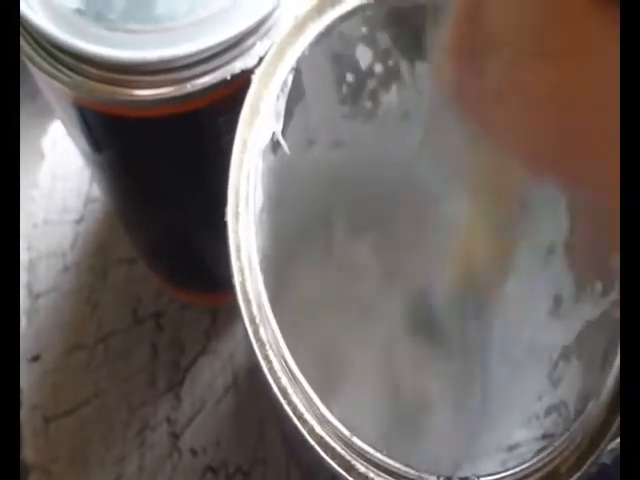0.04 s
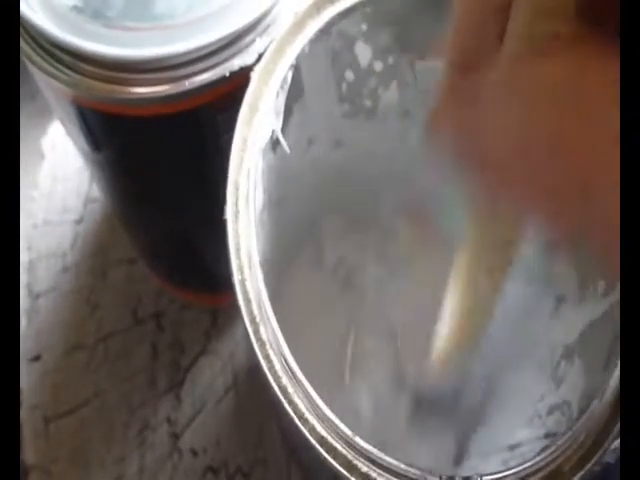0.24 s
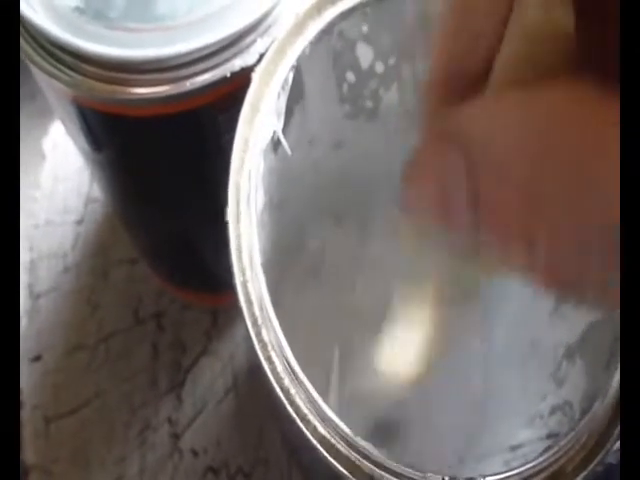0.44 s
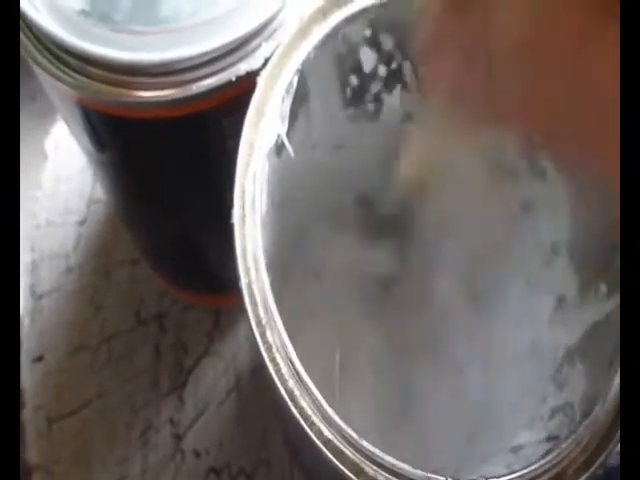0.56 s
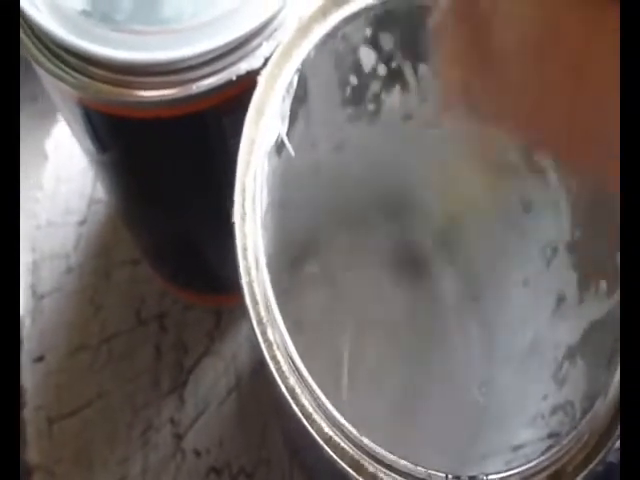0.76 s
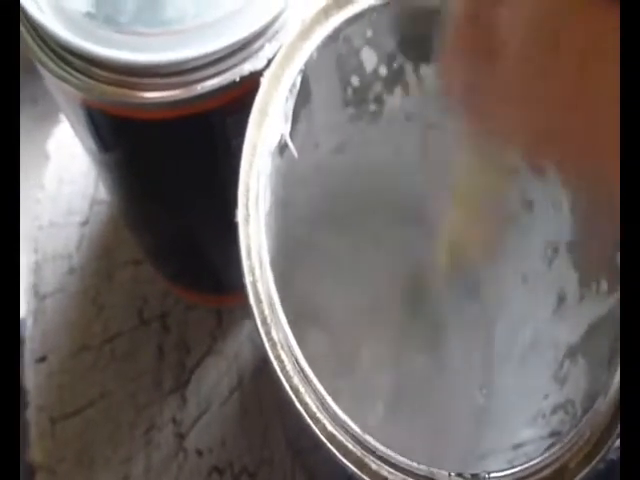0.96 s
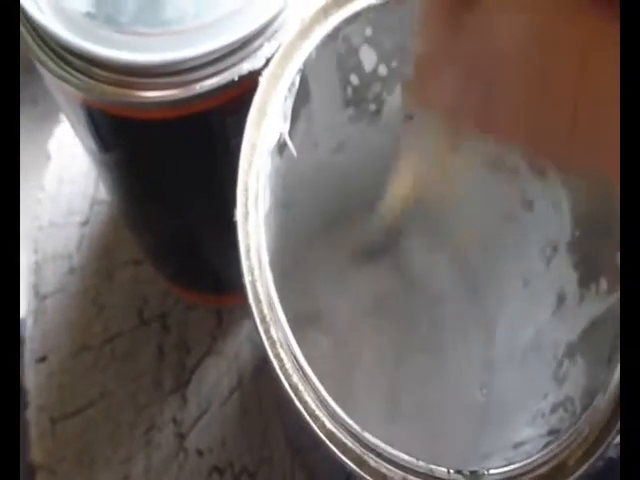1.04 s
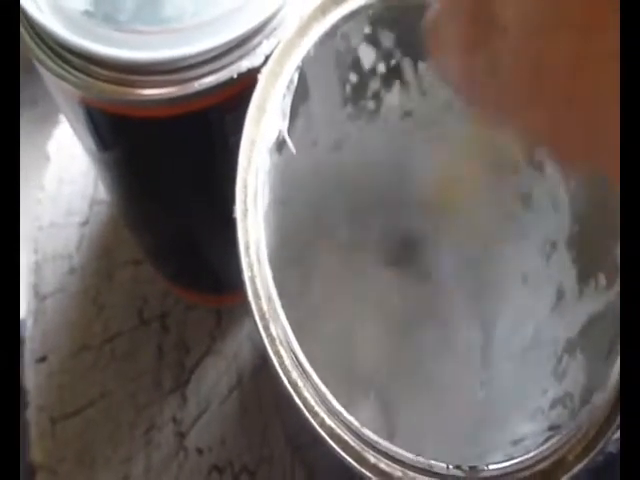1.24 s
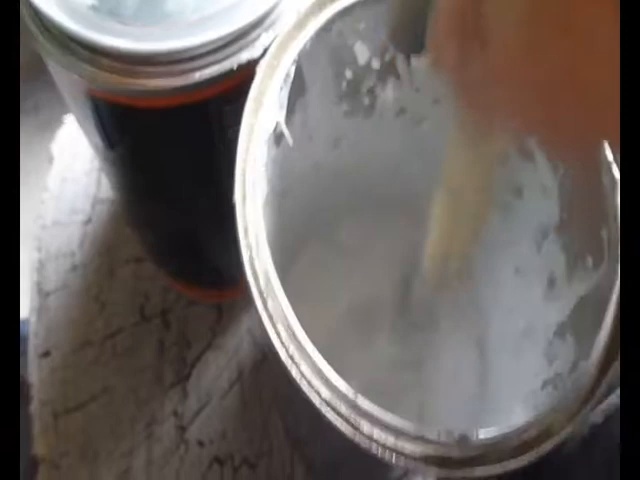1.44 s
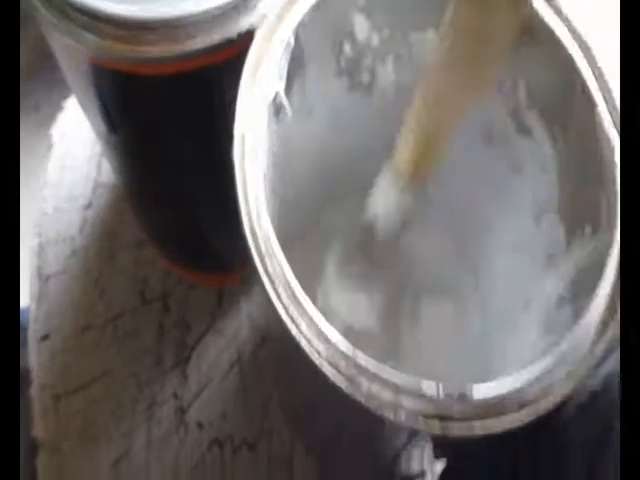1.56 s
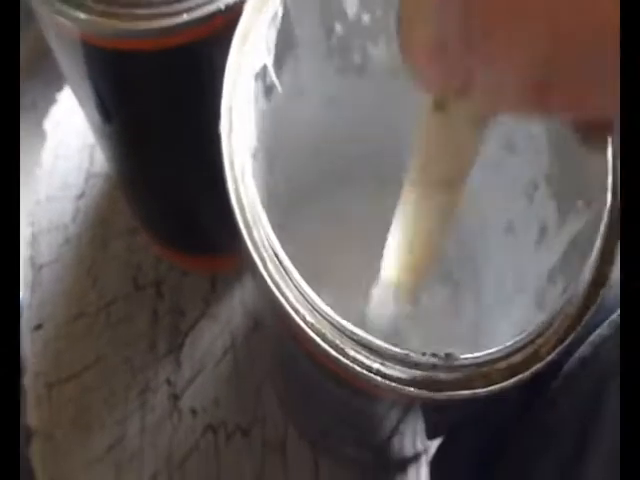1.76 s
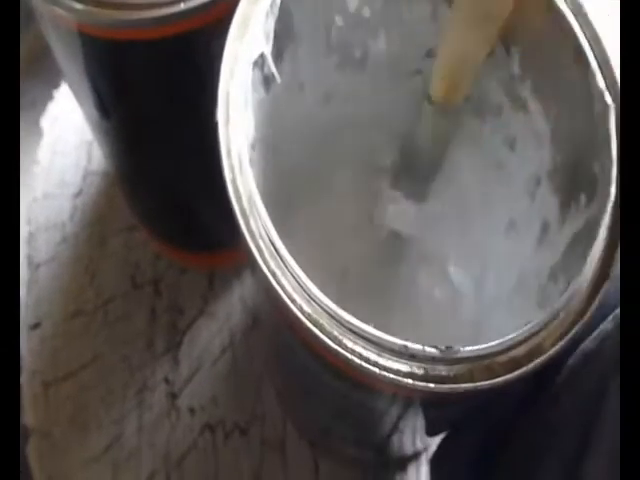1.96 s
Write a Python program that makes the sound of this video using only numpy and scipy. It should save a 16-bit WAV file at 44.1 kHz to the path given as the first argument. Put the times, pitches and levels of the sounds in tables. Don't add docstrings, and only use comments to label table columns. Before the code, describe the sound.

Fast gritty stirring scrapes of a wooden stick in a metal can, with hollow knocks.

```python
import sys
import numpy as np
from scipy import signal
from scipy.fft import rfft, irfft
from scipy.io import wavfile

SR = 44100
rng = np.random.default_rng(int(sys.argv[2]) if len(sys.argv) > 2 else 0)


def generate_wav(signal):
    frames = np.transpose(np.atleast_2d(signal))
    scaled = np.clip(frames, -1, 1) * 32767
    pcm = np.round(scaled).astype(np.int16)
    wavfile.write(sys.argv[1], SR, pcm)


def gain_from_decibels(decibels):
    exponent = np.asarray(decibels, float) / 20
    return 10 ** exponent


N = 88552


def rms_one(x):
    return x / np.sqrt(np.mean(x ** 2) + 1e-20)


def at_hz(points, hz):
    table_hz, values = np.array(points).T
    return np.interp(np.log(hz), np.log(table_hz), values)


def drift(hz):
    r = np.exp(-2 * np.pi * hz / SR)
    settle = 4000
    noise = rng.standard_normal(N + settle)
    return rms_one(signal.lfilter([1], [1, -2 * r, r * r], noise)[settle:])


def resonate(x, hz, width_hz):
    r = np.exp(-np.pi * width_hz / SR)
    top = np.array([1, 0, -1]) * (1 - r * r) / 2
    return signal.lfilter(top, [1, -2 * r * np.cos(2 * np.pi * hz / SR), r * r], x + 1e-18)


def bands(x, low_hz):
    edges = low_hz * 2 ** np.arange(0, np.log2(17000 / low_hz), 1 / 3)
    slices = []
    for k, (low, high) in enumerate(zip(edges, edges[1:])):
        band = signal.butter(2, [low, high], "band", fs=SR, output="sos")
        slices.append((np.sqrt(low * high), signal.sosfilt(band, x[k % 2])))
    return slices


def strike(rows, shape):
    length = 3000
    out, t = np.zeros(N + length), np.arange(length) / SR
    for s, db, hz in rows:
        start = int(s * SR)
        out[start:start + length] += gain_from_decibels(db) * shape(t, hz)
    return out[:N]


# start in seconds, end in seconds, level in dB,
# where along the stroke the tip is fastest (0 to 1).
STROKES = [(-.03, 0.109, -26, 0.65), (0.102, 0.199, -26, .6), (0.191, 0.212, -31.5, 0.5),
           (0.203, 0.363, -27.5, 0.71), (.358, .424, -24, 0.61), (0.43, 0.462, -29, 0.3),
           (0.452, 0.608, -28.5, 0.53), (0.603, 0.704, -26, 0.36), (0.698, 0.826, -28, 0.46),
           (.828, 0.937, -25, 0.48), (0.948, 1.059, -26.5, 0.01), (1.064, 1.163, -26.5, 0.52),
           (1.172, 1.287, -26, 0.5), (1.282, 1.381, -25.5, 0.56), (1.39, 1.502, -27.5, 0.68),
           (1.517, 1.601, -26, 0.33), (1.641, 1.731, -25.5, 0.56)]


def effort_db():
    lift_s, lift_fade_s = 1.712, 0.02
    edge = 0.45
    drag = gain_from_decibels(-35.5)
    t = np.arange(N) / SR
    level = drag * np.ones(N)
    for start, end, db, top in STROKES:
        places = np.array([0, edge * top, top, 1 - edge * (1 - top), 1])
        phase = np.interp(t, start + (end - start) * places, [0, 0.3, 0.5, 0.7, 1])
        level = level + gain_from_decibels(db) * np.maximum(np.sin(np.pi * phase), 0)
    lifted = np.exp(-np.maximum(t - lift_s, 0) / lift_fade_s)
    contact = (level - drag + lifted * drag) / level
    return 20 * np.log10(level), contact


# pitch in Hz, level in dB.
SCRAPE = [(600, -20), (750, -12), (1860, -6.5), (3500, 0), (5000, -1.5), (7000, -21.5), (10000, -47),
          (16000, -11)]
# pitch in Hz, share of the stroke's rise and fall in dB.
FOLLOWS = [(700, 0.15), (2500, 0.62), (5000, 1.17), (12000, 2.4)]


def small_modes(grit, swing_db):
    count = 44
    pitches = np.geomspace(1000, 10000, num=count) * rng.uniform(0.98, 1.02, count)
    out = np.zeros(N)
    for k, hz in enumerate(pitches):
        level_db = at_hz(SCRAPE, hz) + 5 + at_hz(FOLLOWS, hz) * swing_db
        patches_db = 4.5 * drift(19.5)
        push = np.roll(grit[k % 2], 777 * k)
        out = out + gain_from_decibels(level_db + patches_db) * resonate(push, hz, width_hz=95)
    return out


# pitch in Hz, width in Hz, level in dB.
WALL = [(1850, 100, -14), (2595, 70, -13), (3010, 90, -10), (3500, 130, -8), (3780, 90, -12),
        (4400, 110, -10), (4570, 120, -8), (4930, 70, -11), (5600, 130, -13), (6300, 110, -18),
        (7500, 170, -24), (8620, 200, -26)]


def scrape(db, contact):
    grit_per_s, grit_spread_db = 6000, 1.5
    clump_db, clump_hz = 1.3, 110
    patch_db, patch_hz = 5, 24.7
    wall_patch_db, wall_patch_hz = 3, 20
    mean_db = -31.5
    swing_db = db - mean_db

    sizes_db = grit_spread_db * np.minimum(rng.exponential(1, (2, N)), 4)
    sizes = gain_from_decibels(sizes_db) * rng.choice([-1, 1], (2, N))
    snaps = rng.random((2, N)) < grit_per_s / SR
    grit = rms_one(sizes * snaps) * gain_from_decibels(clump_db * drift(clump_hz))

    out = np.zeros(N)
    for hz, x in bands(grit, 699.3):
        level_db = at_hz(SCRAPE, hz) + at_hz(FOLLOWS, hz) * swing_db
        out = out + gain_from_decibels(level_db + patch_db * drift(patch_hz)) * x
    for k, (hz, width_hz, level_db) in enumerate(WALL):
        push_db = at_hz(FOLLOWS, hz) * swing_db + wall_patch_db * drift(wall_patch_hz)
        out = out + gain_from_decibels(level_db + 11) * resonate(grit[k % 2] * gain_from_decibels(push_db), hz, width_hz)
    out = out + small_modes(grit, swing_db)
    return gain_from_decibels(mean_db + 0.34) * rms_one(out * contact)


# loudest moment in seconds, level in dB, pitch in Hz.
CATCHES = [(0.016, -38, 6120), (0.036, -33, 4380), (0.091, -36, 2010), (0.1, -29, 3120), (0.136, -56, 3450),
           (0.162, -24.5, 4475), (0.164, -38, 3620), (0.238, -29.5, 2930), (0.272, -31, 4300),
           (0.31, -26.5, 4600), (0.375, -35, 4430), (0.576, -33, 4620), (0.637, -28, 4920),
           (0.673, -26, 3415), (0.771, -27.5, 4610), (0.798, -28.5, 3177), (1.007, -26.5, 4575),
           (1.072, -30.5, 3470), (1.12, -31, 4500), (1.206, -35, 4650), (1.215, -26.5, 3510),
           (1.315, -28, 3530), (1.348, -30.5, 4500), (1.373, -32, 3340), (1.537, -32.5, 3560),
           (1.575, -29.5, 3410), (1.671, -25.5, 3100), (1.678, -42, 4700)]


def catches():
    catch_s, width_hz = 0.028, 140

    def swell(t, hz):
        noise = rng.standard_normal(len(t))
        ring = rms_one(resonate(resonate(noise, hz, width_hz), hz, 3 * width_hz))
        return gain_from_decibels(-0.5) * ring * np.sin(np.pi * np.clip(t / catch_s, 0, 1)) ** 2

    starts = [(max(s - catch_s / 2, 0), db, hz) for s, db, hz in CATCHES]
    return strike(starts, swell)


# pitch in Hz, width in Hz, level in dB.
HOLLOW = [(450.2, 71.5, -5.5), (526.5, 38.5, 2.5), (611, 207, -8.5), (205, 20, -13.5)]
# start in seconds, peak level in dB, pitch in Hz.
THUDS = [(0.126, -35.5, 494), (0.203, -28, 462), (0.225, -45, 498), (0.28, -35, 568), (0.432, -30, 502),
         (0.605, -32.5, 539), (0.63, -27.5, 509), (0.684, -34.5, 490), (0.727, -36.5, 513),
         (0.806, -59, 527), (0.835, -34.5, 547), (0.879, -23, 485.7), (0.893, -22, 503.5),
         (0.907, -24.5, 595), (0.944, -28, 514), (1.077, -34, 516), (1.152, -31, 501.5), (1.252, -34, 515),
         (1.294, -30.5, 528), (1.356, -30.5, 487), (1.384, -32.5, 604), (1.56, -28, 476), (1.584, -35, 520),
         (1.626, -40.5, 495), (1.649, -36.5, 546)]


def hollow(db, contact):
    rise_s, decay_s = 0.0013, 0.013
    bottom_hz, bottom_db, bottom_decay_s = 193, -26, 0.021
    rumble_hz, rumble_db = 234, -65

    rub_db = -48.5 + 0.1 * (db + 42) + 1 * drift(45.0)
    rub = gain_from_decibels(rub_db) * rng.standard_normal(N) * contact
    air = np.zeros(N)
    for k, (hz, width_hz, level_db) in enumerate(HOLLOW):
        air = air + (-1) ** k * gain_from_decibels(level_db) * resonate(13 * rub, hz, width_hz)
    air = signal.sosfilt(signal.butter(2, 900, fs=SR, output="sos"), air)

    def thud(t, hz):
        swell = (1 - np.exp(-t / rise_s)) * np.exp(-t / decay_s)
        return 1.08 * swell * np.sin(2 * np.pi * hz * t)

    def bottom(t, hz):
        swell = (1 - np.exp(-t / rise_s)) * np.exp(-t / bottom_decay_s)
        return swell * np.sin(2 * np.pi * bottom_hz * hz / 510 * t)

    thuds = strike(THUDS, thud) + gain_from_decibels(bottom_db) * strike(THUDS, bottom)
    low = signal.sosfilt(signal.butter(1, [40, rumble_hz], "band", fs=SR, output="sos"), rub)
    return air + thuds + gain_from_decibels(rumble_db) * rms_one(low)


# multiple of the main pitch, level in dB.
CLACK_PARTIALS = [(.62, -5), (1, 0), (1.3, -4)]
# start in seconds, peak level in dB, main pitch in Hz.
CLACKS = [(.431, -26.5, 1516), (.602, -26, 1490), (.806, -25.5, 1370), (.836, -24.5, 1660),
          (.86, -21.5, 1020), (1.148, -27.5, 1060), (1.484, -30, 1590), (1.746, -31, 1296),
          (1.770, -38, 3840), (1.9485, -43.5, 4460), (1.950, -40, 3330), (1.9525, -37, 1210),
          (1.964, -40, 3920), (1.999, -43, 3300)]


def clacks():
    touch_s, decay_s, crack_s = 0.00058, 0.0035, 0.005

    def clack(t, hz):
        ring = sum(gain_from_decibels(db) * np.sin(2 * np.pi * hz * k * t) for k, db in CLACK_PARTIALS)
        ring = ring * np.exp(-t / decay_s)
        noise = rng.standard_normal(len(t)) * np.exp(-t / crack_s)
        band = signal.butter(2, [hz / 2, 1.74 * hz], "band", fs=SR, output="sos")
        crack = signal.sosfilt(band, noise) * np.sqrt(4000 / hz) + 0.06 * noise
        return np.minimum(t / touch_s, 1) * (ring / 2 + gain_from_decibels(-5) * crack)

    return strike(CLACKS, clack)


def space(x):
    t = np.arange(SR // 2) / SR
    first_echo_s = 0.008
    echo = rng.standard_normal(len(t)) * gain_from_decibels(-60 * t / 0.42) * (t > first_echo_s)
    echo = signal.sosfilt(signal.butter(3, [900, 6200], "band", fs=SR, output="sos"), echo)
    echo = echo / np.sqrt(np.sum(echo ** 2))
    return gain_from_decibels(-25.5) * signal.fftconvolve(x, echo)[:N]


# pitch in Hz, level in dB.
YARD = [(60, -33), (140, -17), (215, -28), (295, -9), (400, -14), (1660, -16.5), (5800, -26), (16000, -32)]


def yard():
    step_hz, step_db = 6300, -9
    hush = np.zeros(N)
    for hz, x in bands(rng.standard_normal((2, N)), 46.1):
        hush = hush + gain_from_decibels(at_hz(YARD, hz) + step_db * (hz > step_hz)) * x
    hush = signal.sosfilt(signal.butter(2, 120, "high", fs=SR, output="sos"), hush)
    return gain_from_decibels(-62) * rms_one(hush)


def scene():
    db, contact = effort_db()
    can = scrape(db, contact) + catches() + hollow(db, contact) + clacks()
    return (can + space(can) + yard())[None]


def roll_off(x):
    return signal.sosfilt(signal.butter(12, 16990, fs=SR, output="sos"), x)


def record(dry):
    bright = dry + gain_from_decibels(12.5) * resonate(dry, hz=15750, width_hz=900)
    hz = np.arange(N // 2 + 1) * SR / N
    mix = irfft(rfft(bright) * (hz < 15830), N)
    return roll_off(mix)


dry = scene()
out = record(dry)
generate_wav(out)
```